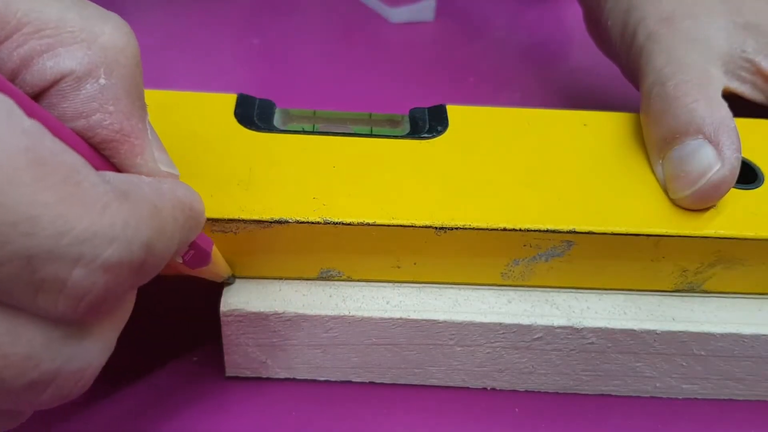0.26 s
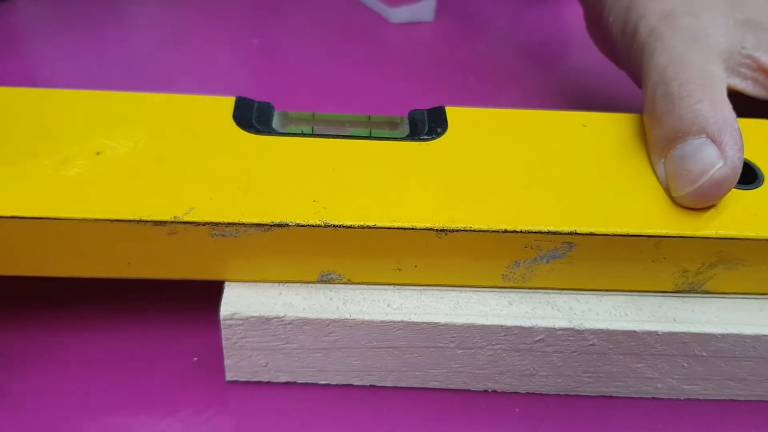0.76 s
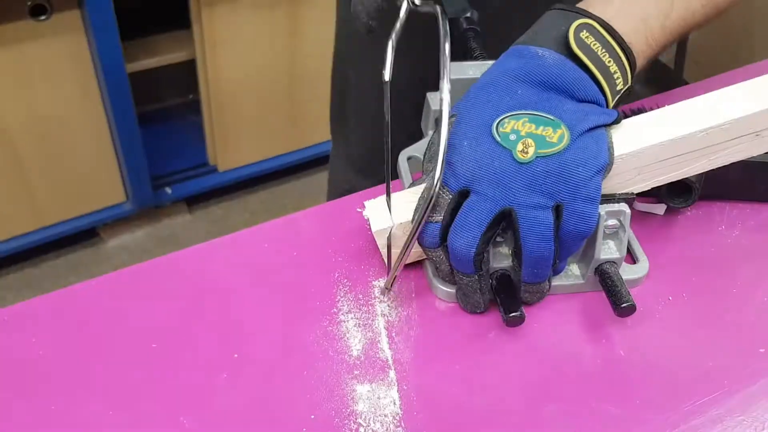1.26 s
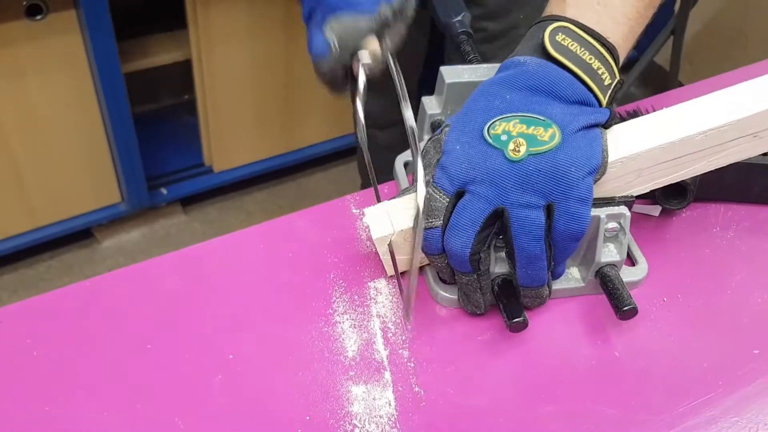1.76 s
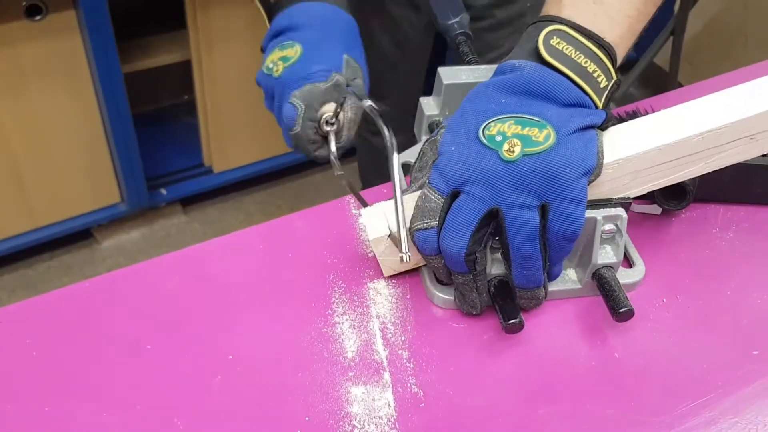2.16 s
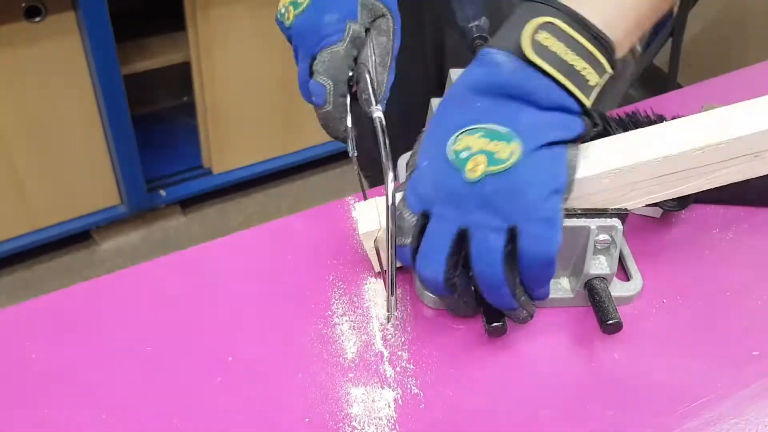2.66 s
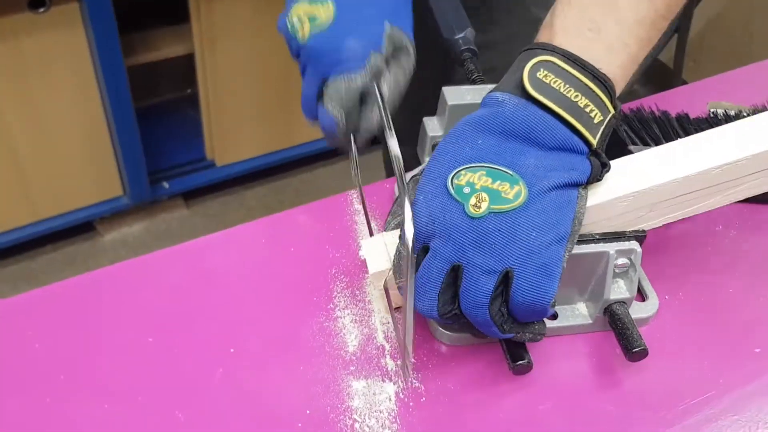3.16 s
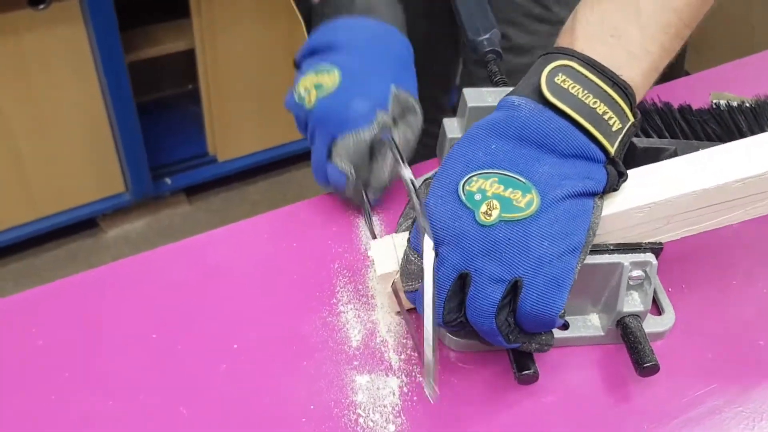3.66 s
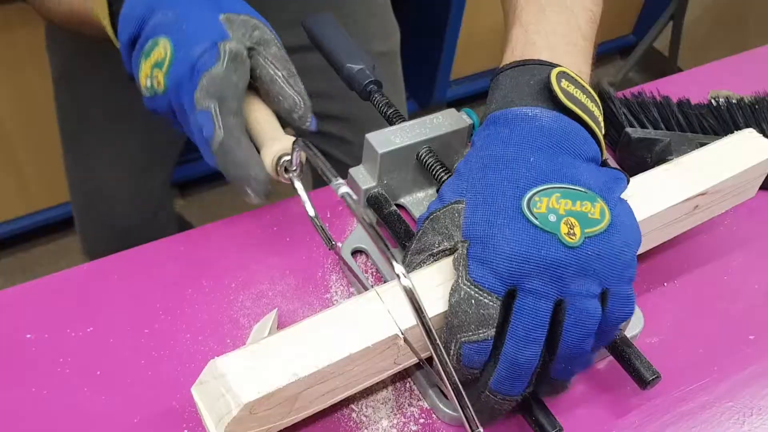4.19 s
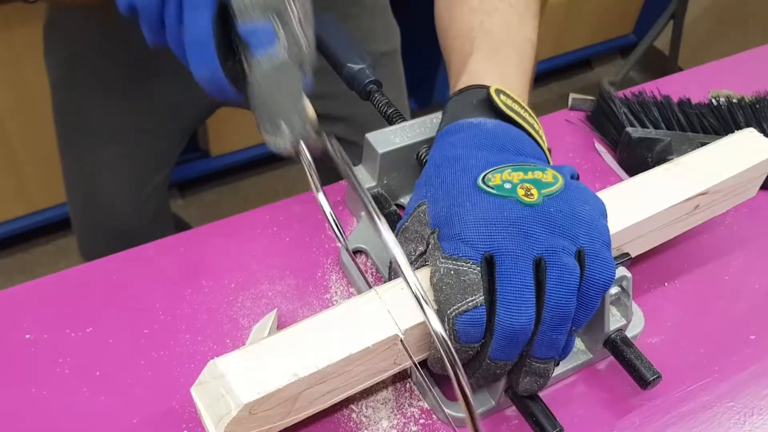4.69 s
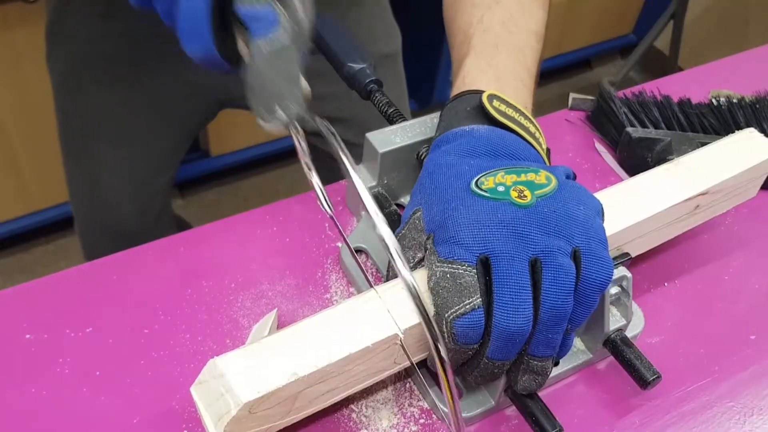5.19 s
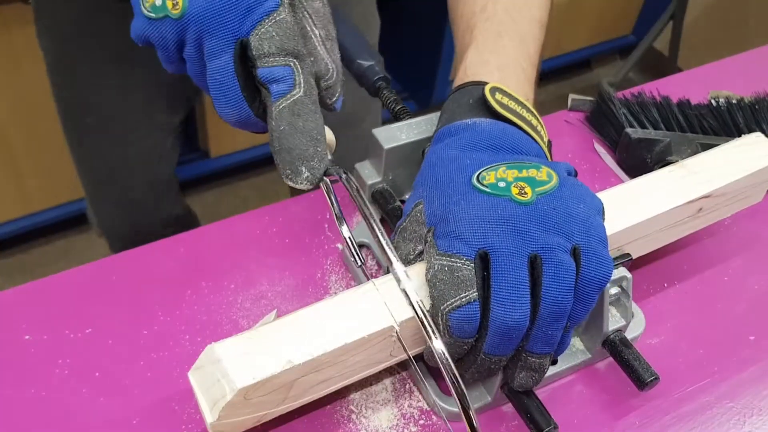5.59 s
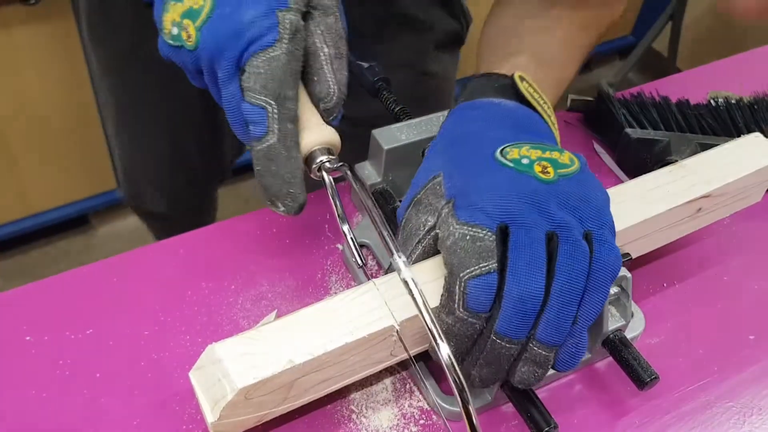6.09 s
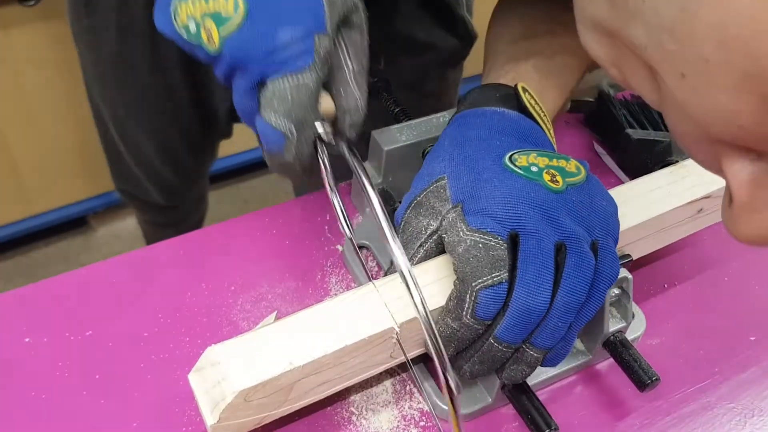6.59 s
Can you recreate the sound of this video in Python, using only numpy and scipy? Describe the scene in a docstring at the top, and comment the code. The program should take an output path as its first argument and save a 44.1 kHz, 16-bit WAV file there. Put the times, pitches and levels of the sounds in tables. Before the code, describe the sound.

A pencil clicks off wood, then sped-up hand sawing chatters in rapid runs, followed by five slower rasping strokes and quiet bumps in a small workshop.

```python
"""A small workshop: a pencil is lifted from a wooden batten, then a coping saw works on it, held in a vise.
Runs of saw strokes, sped up as in a time-lapse, are shaped noise, with short sine bursts where wood chatters.
After a pause come five slower, longer strokes, a faint one and a last light one: crackle that swells and fades.
It sets batten and saw frame ringing; clicks, rubs, breath-like hiss and bumps are short noise and fading sines.
The room adds a fading tail of noise; behind it all are low rumble, thin hiss and a faint, climbing whine."""
import sys
import numpy as np
from scipy import signal
from scipy.fft import rfft, irfft
from scipy.io import wavfile
from scipy.ndimage import uniform_filter1d

SR = 44100
rng = np.random.default_rng(int(sys.argv[2]) if len(sys.argv) > 2 else 0)


def int16_out(signal):
    """Quantize to a 16-bit WAV file."""
    q = np.round(np.clip(np.atleast_2d(signal).T, -1, 1) * 32767)
    wavfile.write(sys.argv[1], SR, q.astype(np.int16))


N = 302085
TIME = np.arange(N) / SR
FREQ = np.maximum(np.arange(N // 2 + 1) * SR / N, 1)

# All spectra below list only the shape; colour() evens out the loudness.
# hiss of saw teeth, also used for rubs, breath-like hiss and clicks: (frequency [Hz], relative level [dB])
TEETH_SPECTRUM = [(500, -31), (2000, 0), (3200, 1), (4800, -2), (7000, 1), (8800, -4.5), (10800, 1),
                  (12500, 0.5), (15800, 1.5)]
# wood being rubbed or clicked: (frequency [Hz], relative level [dB])
RUBBED_WOOD_SPECTRUM = [(40, -7), (140, 4), (300, 1.5), (600, -3), (1000, -0.5), (1800, -18), (3000, -52),
                        (8000, -28)]


def amp(db):
    """Turn decibels into a gain."""
    return 10 ** (np.asarray(db) / 20)


def unit(x):
    """Scale to an average (rms) strength of 1."""
    return x / np.sqrt(np.mean(x ** 2))


def pan(x, db):
    """Make the left side louder than the right by db in all."""
    return x * amp(np.array([[db], [-db]]) / 2)


def colour(x, points):
    """Filter by a curve of (frequency [Hz], level [dB]) points, then scale to rms 1."""
    hz, db = np.transpose(points)
    gain = amp(np.interp(np.log(FREQ), np.log(hz), db))
    return unit(irfft(rfft(x) * gain, N))


def lowpass(x, hz):
    """Take away the treble above hz with a steep filter."""
    return signal.sosfilt(signal.butter(4, min(hz, SR / 3), fs=SR, output="sos"), x)


def spread(three):
    """Blend one shared and two separate signals: left and right agree in the bass and differ in the treble."""
    shared_and_sides = rfft(three)
    alike = 1 / (1 + (FREQ / 770) ** 1.48)  # half the power is shared at 770 Hz
    return irfft(shared_and_sides[0] * np.sqrt(alike) + shared_and_sides[1:] * np.sqrt(1 - alike), N)


def noise():
    """Make stereo white noise."""
    return spread(rng.standard_normal((3, N)))


def crackle(rate, scatter_db, grain_s):
    """Random snaps, about rate a second, like fibres breaking: tiny fading bursts of noise, uneven in size."""
    size_db = scatter_db * np.minimum(rng.exponential(size=N), 4)
    snaps = (rng.random(N) < rate / SR) * amp(size_db)
    power = signal.lfilter([1], [1, -np.exp(-1 / (grain_s * SR))], snaps ** 2)
    return unit(noise() * np.sqrt(power))


def swell(at, rise, fall):
    """A movement speeds up to its peak and slows down again, along a bell curve."""
    width = np.where(TIME < at, rise, fall)
    return np.exp(-.5 * np.minimum(((TIME - at) / width) ** 2, 100))


def bite(t, rise, tail):
    """The strength of a short bite: it peaks at t = 0 and then dies away."""
    return np.where(t < 0, np.exp(-.5 * (t / rise) ** 2), np.exp(1 - np.sqrt(1 + (t / tail) ** 2)))


def add(track, at, piece):
    """Mix a short piece into a track."""
    i = int(at * SR)
    track[..., i:i + piece.shape[-1]] += piece[..., :N - i]


def room(x, t60, dull_hz, wet_db):
    """Add the workshop's answer: noise that fades by 60 dB in t60 seconds, with softened treble."""
    t = TIME[:SR]
    tail = noise()[:, :SR] * np.exp(-np.log(1000) * t / t60) * (t > .006)
    tail = tail / np.sqrt(np.sum(tail ** 2) / 2)
    tail = signal.sosfilt(signal.butter(1, min(dull_hz, SR / 3), fs=SR, output="sos"), tail)
    source = x[None] if x.ndim == 1 else x
    return x + amp(wet_db) * signal.fftconvolve(source, tail, axes=1)[:, :N]


def strokes():
    """Lay push and return at an even pace between grabs; rows of (time, wood dB, chatter Hz, teeth dB)."""
    # runs of sped-up strokes: (first stroke [s], last stroke [s], time per stroke [s],
    # wood setting [dB], teeth setting [dB], extra wood on the return [dB])
    runs = [(1.153, 1.395, .02, -37.5, -43, -6), (1.418, 2.097, .0205, -34, -43, 2),
            (2.168, 2.444, .0205, -33.5, -44.5, -2), (2.521, 2.64, .019, -32, -47.5, -7),
            (2.735, 2.804, .019, -40.5, -49.5, -6), (2.815, 3.144, .019, -33.5, -44.5, -1),
            (3.191, 3.419, .018, -33, -47, -3.5), (3.472, 3.904, .018, -35, -47.5, -1)]
    # strokes on which the blade grabs hard: (time [s], wood setting [dB], chatter pitch [Hz])
    grabs = np.array([(1.194, -32, 496), (1.233, -31, 745), (1.274, -29.5, 536), (1.308, -31, 534),
                      (1.347, -29, 1130), (1.396, -30.5, 494), (1.439, -29.5, 530), (1.466, -31, 754),
                      (1.526, -31, 2000), (1.546, -30, 776), (1.622, -31.5, 780), (1.687, -31, 870),
                      (1.733, -28.5, 996), (1.795, -31, 1660), (1.842, -30, 1540), (1.884, -33, 1120),
                      (1.97, -30, 1610), (2.008, -32, 1100), (2.073, -32, 1140), (2.168, -31.5, 990),
                      (2.192, -31, 790), (2.248, -31, 980), (2.331, -28.5, 745), (2.421, -32.5, 455),
                      (2.521, -26, 581), (2.559, -33, 730), (2.761, -32.5, 1160), (2.839, -30.5, 694),
                      (2.874, -28.5, 1026), (3.031, -32, 1800), (3.074, -30, 1230), (3.122, -31, 1410),
                      (3.191, -29.5, 372), (3.299, -30.5, 407.5), (3.365, -33.5, 343.8), (3.4, -27, 1008),
                      (3.472, -31.5, 646), (3.607, -29, 544.6), (3.68, -30, 620), (3.77, -31.5, 1100),
                      (3.821, -34, 970)])
    usual_hz, pitch_scatter_oct = 860, .5
    wood_scatter_db, teeth_scatter_db, timing_scatter_s = -0.46, 4, 0.001325
    rows = []
    for first, last, pace, wood_db, teeth_db, return_db in runs:
        grabbed = [tuple(grab) for grab in grabs if first - pace / 2 < grab[0] < last + pace / 2]
        # a run also begins and ends with a stroke where no grab is close
        ends = [(at, wood_db, usual_hz) for at in (first, last)
                if all(abs(at - grab[0]) > pace / 2 for grab in grabbed)]
        beats = sorted(grabbed + ends)
        rows += [(*beat, teeth_db) for beat in beats]
        for (start, _, _), (end, _, _) in zip(beats, beats[1:]):
            count = max(round((end - start) / pace), 1)
            times = np.linspace(start, end, count, endpoint=False)[1:]
            chance = rng.standard_normal((len(times), 4))
            for k, (at, (late, force, grip, teeth)) in enumerate(zip(times, chance)):
                returning = k % 2 == 0
                rows.append((at + timing_scatter_s * late,
                             wood_db + return_db * returning + wood_scatter_db * force,
                             usual_hz * 2 ** (pitch_scatter_oct * grip),
                             teeth_db + teeth_scatter_db * teeth))
    return rows


def sped_up_strokes():
    """Each stroke is a short rasp; the blade grabs and the batten chatters at a pitch set by the grip."""
    # rasping wood: (frequency [Hz], relative level [dB])
    wood_spectrum = [(150, -19.5), (300, -1), (560, 0), (880, -5.5), (1080, 3.5), (1300, -5.5), (1900, -4),
                     (2500, -15), (4000, -23), (8000, -30)]
    # low rumble of the bench: (frequency [Hz], relative level [dB])
    rumble_spectrum = [(20, -19), (50, -26), (120, -3), (220, -4), (350, -8.5), (700, -46), (2000, -57.5)]
    lead = .02  # seconds kept free ahead of each peak
    t = TIME[:SR // 12] - lead
    wood_power, teeth_power, chatter = np.zeros(N), np.zeros(N), np.zeros((2, N))
    rows = strokes()
    chance = rng.standard_normal((len(rows), 2))
    for (at, wood_db, hz, teeth_db), (phase, lag) in zip(rows, chance):
        add(wood_power, at - lead, (amp(wood_db) * bite(t, rise=0.0048, tail=0.0043)) ** 2)
        add(teeth_power, at - lead, (amp(teeth_db) * bite(t + 0.00045, rise=0.0053, tail=0.004)) ** 2)
        delay = np.array([[1], [-1]]) * (.00005 + .00005 * lag)  # path difference to the microphones
        ring = np.sin(2 * np.pi * (hz * (t - delay) + phase)) * bite(t, rise=0.0028, tail=0.0026)
        ring_db = wood_db + .75 * (wood_db + 28.5)  # hard grabs ring out more
        add(chatter, at - lead, amp(ring_db) * ring)
    # between strokes the blade still drags in the cut, and the bench rumbles as long as these runs last
    effort = np.sqrt(np.abs(uniform_filter1d(teeth_power, int(0.036 * SR))))
    rumble = amp(3.0) * effort * colour(noise(), rumble_spectrum)
    wood = np.sqrt(wood_power + (amp(3.0) * effort) ** 2)
    rasp = amp(-2.5) * wood * colour(noise(), wood_spectrum)
    teeth = np.sqrt(teeth_power + (amp(-6) * effort) ** 2)
    hiss = teeth * colour(crackle(rate=3200, scatter_db=3.5, grain_s=0.0012), TEETH_SPECTRUM)
    body = room(rasp + amp(4) * chatter, t60=0.14, dull_hz=3240, wet_db=-11.5)
    return pan(body, db=-0.7) + pan(hiss, db=-0.9) + rumble


def clamped(x):
    """The clamped batten and the saw frame ring at their own pitches, damped by the gloved hands."""
    # resonances: (frequency [Hz], least width [Hz], relative level [dB])
    resonances = [(224, 31, -7), (321.6, 2.3, 6), (394, 39, 1), (468, 24, 1), (567, 10, -28), (590, 5.3, 4),
                  (671.6, 6.9, -1.5), (774.5, 39, 3), (890, 8.3, 4), (1219, 24, 3.5), (1350, 37, -2),
                  (1518, 26, -4), (2082, 25, -5), (2270, 16, -3), (2350, 33, -24), (2603, 37, -8.5),
                  (2610, 26, -8), (3850, 60, -17), (5260, 35, -22), (6770, 40, -23), (7420, 110, -22),
                  (9930, 620, -20.5)]
    grip_loss = .016  # the hands keep each width at or above this share of its frequency
    response = 0
    for hz, width, db in resonances:
        damping = max(width, grip_loss * hz)
        response = response + amp(db) / (1 + 1j * (FREQ ** 2 - hz ** 2) / (FREQ * damping))
    return unit(irfft(rfft(x) * response, N))


def slow_strokes():
    """Teeth hiss with blade speed; the wood is offset in time, as the arm leans in, and the bench booms on."""
    # strokes: (time of top speed [s], speeding up [s], slowing down [s],
    # wood setting [dB], teeth setting [dB], bench boom setting [dB])
    slow = [(4.747, 0.033, 0.035, -31.5, -34, -36), (4.892, 0.027, 0.039, -36.5, -36, -34.5),
            (5.049, 0.029, 0.028, -24.5, -30.5, -35.5), (5.176, 0.036, 0.043, -34, -35.5, -40),
            (5.332, 0.027, 0.023, -23.5, -30.5, -35.5), (5.406, .03, 0.04, -41.5, -48.5, -48.5),
            (6.627, 0.04, 0.036, -41.5, -47, -44)]
    # sawn wood: (frequency [Hz], relative level [dB])
    wood_spectrum = [(30, -48), (100, -13), (250, -4), (700, -3.5), (1100, -10.5), (1700, -19), (2500, -2),
                     (2900, -34), (6000, -30)]
    # booming bench: (frequency [Hz], relative level [dB])
    boom_spectrum = [(40, -40), (75, -22), (100, -0.5), (119, 4.5), (148, -5), (172, -5), (200, -6.5),
                     (400, -43.5)]
    push_power, speed_power, shake_power = 0, 0, 0
    for at, rise, fall, wood_db, teeth_db, boom_db in slow:
        push_power = push_power + (amp(wood_db) * swell(at + 0.0084, rise, fall)) ** 2
        speed_power = speed_power + (amp(teeth_db) * swell(at, rise, fall)) ** 2
        shake_power = shake_power + (amp(boom_db) * swell(at + 0.016, 1.25 * rise, 2.1 * fall)) ** 2
    push, speed, shake = np.sqrt(push_power), np.sqrt(speed_power), np.sqrt(shake_power)
    force = push * crackle(rate=510, scatter_db=4.5, grain_s=0.00072)
    ring = clamped(force) * np.std(force) * amp(-5.0)
    rasp = amp(-4.5) * push * colour(crackle(rate=1400, scatter_db=0, grain_s=0.0029), wood_spectrum)
    # as the blade slows, single teeth tear at the fibres: a coarser, lower growl
    slowing = np.interp(TIME - .025, TIME, push)
    fibres = colour(crackle(rate=250, scatter_db=1.0, grain_s=0.00076), wood_spectrum)
    tearing = amp(-11.5) * slowing * lowpass(fibres, hz=1100)
    hiss = amp(-2.5) * speed * colour(crackle(rate=14000, scatter_db=1.0, grain_s=0.00098), TEETH_SPECTRUM)
    boom = shake * colour(noise(), boom_spectrum)
    wood = room(ring + rasp + tearing, t60=0.49, dull_hz=1800, wet_db=-6)
    return pan(wood, db=-0.1) + room(hiss, t60=0.18, dull_hz=8950, wet_db=-3.0) + boom


def bumps():
    """Bench bumps and blade catches thud and ring the bench; longer contact weakens the high pitches."""
    # bumps: (time [s], ring setting [dB], contact time [s], thud setting [dB], top of the thud [Hz])
    bump_table = [(0.373, -37, 0.00025, -44.5, 1450), (.384, -31.5, 0.0013, -36, 476),
                  (0.894, -54.5, 0.0022, -52, 700), (0.969, -50, 0.0013, -45.5, 1550),
                  (4.762, -27, 0.0052, -30.5, 1500), (4.86, -31, .002, -28, 1450),
                  (5.289, -33.5, 0.0025, -33, 990), (5.875, -75, .001, -55, 1500),
                  (6.259, -28.5, 0.01, -39.5, 700)]
    # ringing pitches of the bench: (frequency [Hz], relative level [dB], time to fade by 60 dB [s])
    bench_modes = [(91, -14.5, 0.49), (123.8, 0, 0.28), (141, 2, 0.11), (246.7, -17.5, 0.78),
                   (289, -1, 0.057), (362, -7.5, 0.048), (430, -14, 0.13), (560, -28, 0.14),
                   (855, -24, 0.24), (1120, -14, 0.12), (1160, -16, 0.26)]
    # woody thud: (frequency [Hz], relative level [dB])
    thud_spectrum = [(40, -22), (120, -2), (280, -1), (450, -2.5), (660, -1), (900, -8), (1400, -7.5),
                     (3000, -21)]
    t, rings, thuds = TIME[:SR], np.zeros(N), 0
    wood = colour(noise(), thud_spectrum)
    for at, ring_db, contact, thud_db, top_hz in bump_table:
        ring = 0
        for hz, mode_db, t60 in bench_modes:
            strength = amp(mode_db) / np.hypot(1, hz * contact)
            ring = ring + strength * np.sin(2 * np.pi * hz * t) * np.exp(-np.log(1000) * t / t60)
        add(rings, at, amp(ring_db) * ring * (1 - np.exp(-t / contact)))
        hit = bite(TIME - at - .003, rise=0.00065, tail=0.017)
        thuds = thuds + amp(thud_db) * hit * lowpass(wood, top_hz)
    # a small bench radiates no deep bass
    rings = signal.sosfilt(signal.butter(2, 70, "high", fs=SR, output="sos"), rings)
    return room(rings, t60=0.38, dull_hz=2515, wet_db=-5.5) + room(thuds, t60=0.37, dull_hz=2500, wet_db=-1.5)


def ticks():
    """The pencil clicks off the edge and later the offcut snaps free: short bursts of dull and bright grit."""
    # contacts: (time [s], length setting [s], wood setting [dB], crack setting [dB],
    # treble tilt of the crack [dB per octave], left minus right [dB])
    tick_table = [(0.126, 0.0066, -66, -58, 10, 15), (0.369, 0.0035, -38.5, -33.5, 3.5, 4),
                  (0.609, 0.0011, -77, -46.5, 8.5, 13), (3.968, 0.0072, -36, -34.5, -0.5, 0)]
    grit = crackle(rate=11000, scatter_db=0.5, grain_s=0.00015)
    dull, sound = colour(grit, RUBBED_WOOD_SPECTRUM), 0
    for at, length, wood_db, crack_db, tilt, side_db in tick_table:
        bright = colour(grit, [(hz, db + tilt * np.log2(hz)) for hz, db in TEETH_SPECTRUM])
        knock = amp(wood_db) * bite(TIME - at - .003, 0.0036, 0.38 * length) * dull
        crack = amp(crack_db) * bite(TIME - at, .5 * length, .5 * length) * bright
        sound = sound + knock + pan(crack, side_db)
    return room(sound, t60=0.21, dull_hz=5030, wet_db=-11.5)


def rubs_and_breathy_swells():
    """Soft rubs of hand, tool and batten, later also breath-like swells of hiss: fine crackle that rises and fades."""
    # rubs and swells: (time of peak [s], rise [s], fall [s], wood setting [dB], hiss setting [dB])
    swells = [(.2, 0.091, 0.12, -76.5, -89), (.64, 0.0092, 0.044, -74, -70), (.905, 0.0051, 0.11, -74, -69),
              (.976, 0.011, 0.024, -49.5, -60.5), (1.101, 0.0062, 0.049, -56, -60.5),
              (4.135, 0.013, 0.28, -68.5, -60.5), (4.4, 0.054, 0.066, -61.5, -59),
              (5.64, 0.093, 0.072, -65, -57.5), (5.81, 0.0096, 0.05, -51, -50),
              (5.881, 0.0044, 0.033, -52, -87), (6.06, 0.21, 0.066, -77, -61),
              (6.33, 0.098, 0.09, -73, -61)]
    wood = sum(amp(db) * swell(at, rise, fall) for at, rise, fall, db, _ in swells)
    hiss = sum(amp(db) * swell(at, rise, fall) for at, rise, fall, _, db in swells)
    grit = crackle(rate=6800, scatter_db=1.0, grain_s=0.0004)
    soft = wood * colour(grit, RUBBED_WOOD_SPECTRUM) + hiss * colour(grit, TEETH_SPECTRUM)
    return room(soft, t60=0.41, dull_hz=2940, wet_db=-3.5)


def whine():
    """A thin tone climbs like a distant motor running up, wavering in level as it crosses the room."""
    # path of the tone: (time [s], pitch [Hz], level before wavering [dB])
    path = [(4.12, 857, -74.5), (4.65, 995, -80), (5.8, 1250, -74.5), (6.15, 1308, -79.5),
            (6.35, 1340, -72.5), (6.55, 1390, -99)]
    s, hz, db = np.transpose(path)
    phase = 2 * np.pi * np.cumsum(np.interp(TIME, s, hz)) / SR
    drift = unit(lowpass(rng.standard_normal((2, N)), hz=25))
    waver = amp(6 * drift)  # typically 6 dB up or down, separately left and right
    level = np.interp(TIME, s, amp(db), left=0, right=0)
    return np.sqrt(2) * level * waver * np.sin(phase)  # sqrt(2) gives the sine an rms of 1


def air():
    """Low rumble, much stronger while the sped-up sawing lasts, and a thin, steady hiss: both filtered noise."""
    # rumble level: (time [s], level [dB])
    rumble_levels = [(0, -66.5), (.8, -71), (1.2, -50.5), (4.04, -54), (4.16, -63), (5.65, -65.5),
                     (6.1, -68.5), (6.85, -58.5)]
    # low rumble: (frequency [Hz], relative level [dB])
    rumble_spectrum = [(20, -7.5), (50, 1.5), (120, 2), (180, -13.5), (450, -13.5), (850, -20),
                       (1500, -27.5), (4000, -38), (15800, -45)]
    # microphone hiss: (frequency [Hz], relative level [dB])
    hiss_spectrum = [(500, -12), (3000, -9.5), (5500, -8.5), (7000, -4.5), (8500, -8), (11000, 0),
                     (13500, 0), (15800, -1.5)]
    s, rumble_db = np.transpose(rumble_levels)
    rumble = colour(noise(), rumble_spectrum) * amp(np.interp(TIME, s, rumble_db))
    return rumble + colour(noise(), hiss_spectrum) * amp(-67.5)


def scene():
    """Add up everything at the bench and in the room."""
    return (sped_up_strokes() + slow_strokes() + bumps() + ticks()
            + rubs_and_breathy_swells() + whine() + air())


def record(dry):
    """The two microphones differ a little in colour, and the top of the treble is cut off."""
    # microphone colour: (frequency [Hz], left minus right [dB])
    side_colour = [(60, 2), (250, -0.5), (550, 2), (2000, 1), (4500, 0.5), (8000, 0), (13000, 2.5)]
    hz, db = np.transpose(side_colour)
    tilt = np.interp(np.log(FREQ), np.log(hz), db)
    heard = irfft(rfft(dry) * amp(np.array([tilt, -tilt]) / 2), N)
    return signal.sosfilt(signal.ellip(10, .2, 80, 15950, fs=SR, output="sos"), heard)  # cut above 15950 Hz


dry = scene()
out = record(dry)
int16_out(out)
```